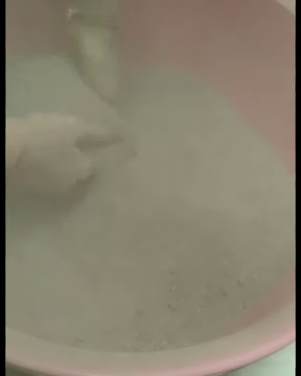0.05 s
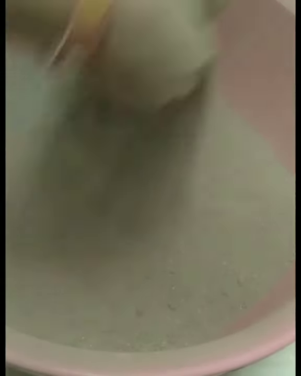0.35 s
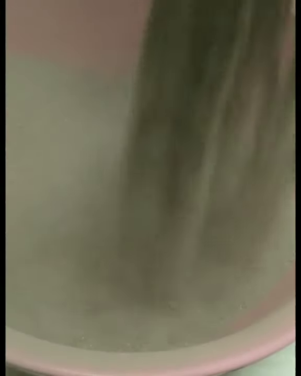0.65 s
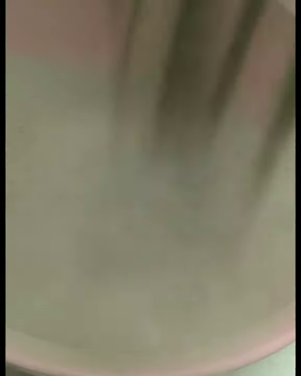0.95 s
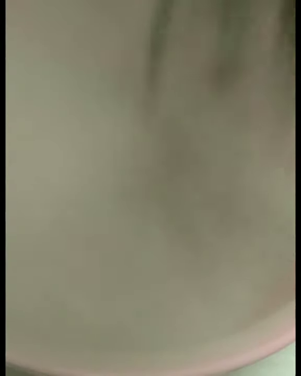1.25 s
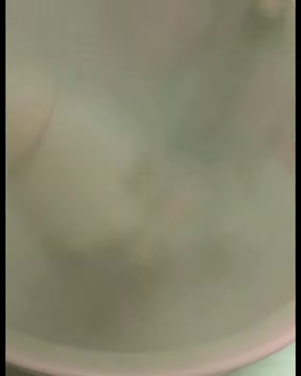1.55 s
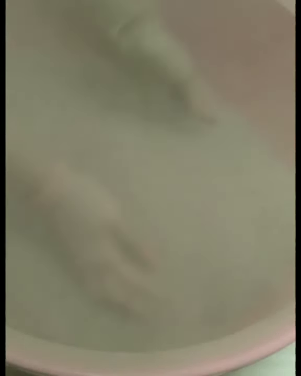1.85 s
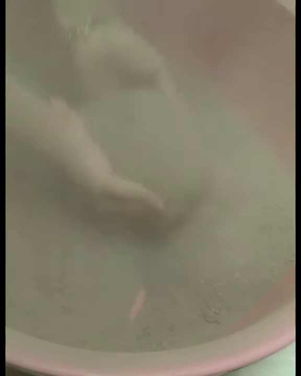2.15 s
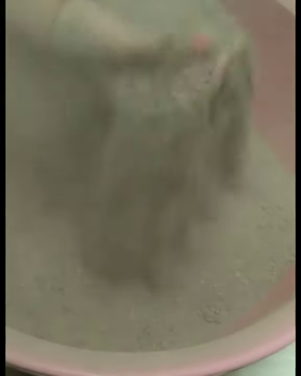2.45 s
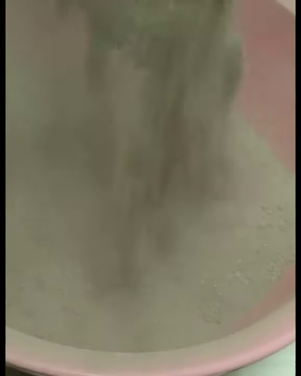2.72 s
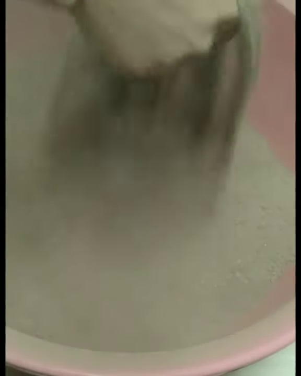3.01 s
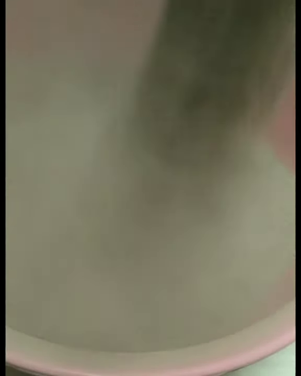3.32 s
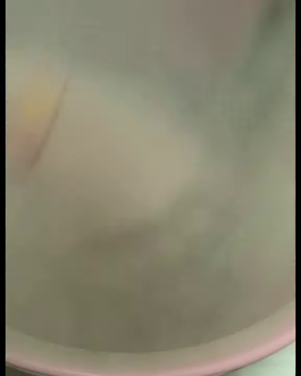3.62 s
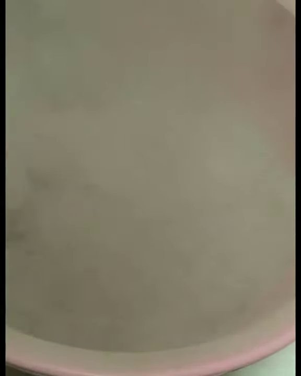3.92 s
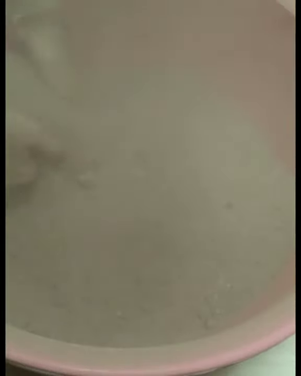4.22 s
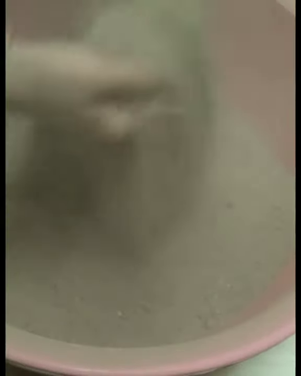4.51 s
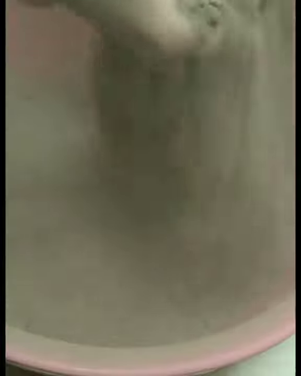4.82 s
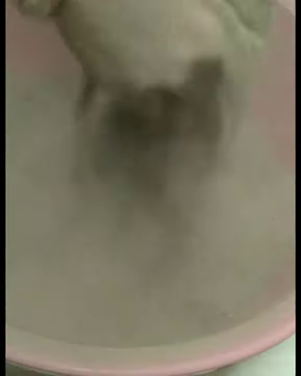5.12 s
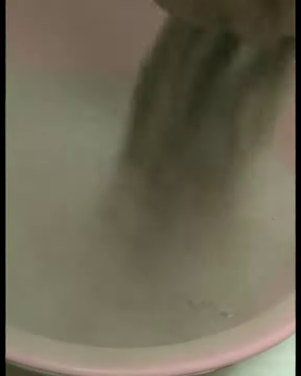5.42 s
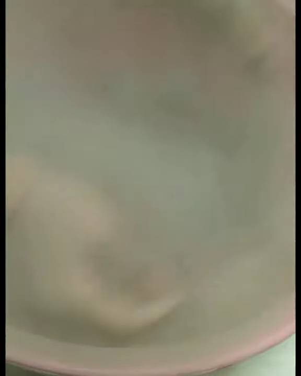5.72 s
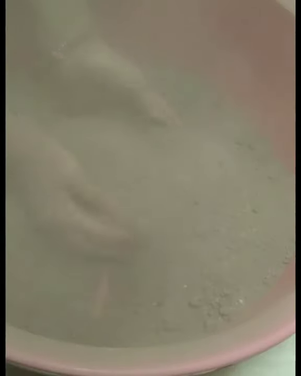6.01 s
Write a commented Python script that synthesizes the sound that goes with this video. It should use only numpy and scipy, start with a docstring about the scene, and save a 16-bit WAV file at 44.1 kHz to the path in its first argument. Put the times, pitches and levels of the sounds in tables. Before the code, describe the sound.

Hands dig through fine dry sand in a plastic tub, swishing, crunching soft lumps and letting handfuls fall in hissing streams.

```python
"""Dry sand in a plastic tub.

Close by, hands dig into fine sand, lift it and let it stream back. Grains shear past the fingers
in a swish and drag along the tub's wall; clods thud on the heap, coarse grains tick, and streams
hiss with countless tiny impacts. Soft lumps crush under the fingers and make the tub ring a little.
A small room rumbles underneath, with a mains hum."""
import sys
import numpy as np
from scipy import signal
from scipy.fft import rfft, irfft, next_fast_len
from scipy.io import wavfile
from scipy.ndimage import uniform_filter1d, map_coordinates

SR = 44100
rng = np.random.default_rng(int(sys.argv[2]) if len(sys.argv) > 2 else 0)


def master_out(mix):
    """Clip the mix to full scale and print it as 16-bit PCM to the path in sys.argv[1]."""
    frames = np.transpose(np.atleast_2d(mix))
    ceiling = np.clip(frames, -1, 1)
    pcm = np.round(ceiling * 32767).astype(np.int16)
    wavfile.write(sys.argv[1], SR, pcm)


N = 267246

# Hand strokes: (peak [s], swish [dB], rise [s], fall [s], scrape re swish [dB], push re swish [dB],
# scrape brightness [-1 dull to 1 bright])
HAND_STROKES = [ (0.028, -46.5, 0.35, 0.15, -11.5, -10, -.4), (0.2, -57.5, 0.094, 1, -2.5, -8, 0),
                (1.275, -54.5, 0.072, 0.22, 5, -22, .3), (1.392, -40, 0.13, 0.12, -15, -18, -0.55),
                (1.575, -50.5, 0.14, 0.13, -6, -4, -0.1), (1.622, -33.5, 0.028, 0.071, -6, -24, -0.4),
                (1.788, -42.5, 0.055, 0.1, -4, -2.5, 0), (1.841, -30, 0.079, 0.097, -12.5, -16, .2),
                (1.871, -36, 0.056, 0.085, 7, -7.5, -0.17), (1.99, -62.5, 0.17, 0.18, 10.5, 7.5, -0.26),
                (3.538, -35, 0.045, 0.06, -4, -38, 0), (3.684, -28.5, 0.05, 0.04, -3.5, -21, .3),
                (3.765, -28, 0.029, 0.083, -4.5, -10, -0.3), (3.868, -23.5, 0.036, 0.071, -18, -17, 0),
                (3.895, -26, 0.24, 0.21, -7, -9.5, 0.4), (3.98, -31, 0.13, 0.15, -10, -9, -.2),
                (4.13, -47.5, 0.15, 0.21, 3, 4.5, -0.099), (4.22, -45.5, 0.087, 0.42, -0.5, -25, 0.23),
                (4.34, -58, 0.089, 0.11, -10, -20, -0.07), (4.755, -39.5, 0.081, 0.087, 1, -12, -.6),
                (4.847, -39.5, 0.17, 0.22, -6, -37, -0.16), (5.459, -38.5, 0.043, 0.071, -9, -19, -0.1),
                (5.605, -27.5, 0.019, 0.035, -28, -34, 0), (5.651, -30.5, 0.092, 0.17, -9, -17, -0.25),
                (5.818, -33.5, 0.043, 0.045, -3, -6.5, -0.3), (5.919, -29, 0.12, 0.19, -1, -12.5, 0.27), ]
# Sand sliding on the tub's wall: (peak [s], level [dB], rise [s], fall [s], ring pitch [Hz])
WALL_DRAGS = [(0.03, -53.5, 0.053, 0.047, 780), (1.398, -48.5, 0.049, 0.035, 1080),
              (1.638, -49, .04, .045, 1110), (2.77, -57.5, 0.31, 0.15, 990),
              (3.89, -44.5, 0.18, 0.29, 1036), (4.13, -54.5, 0.059, 0.082, 1050),
              (4.29, -54, 0.16, 0.18, 1065), (4.78, -46, .05, 0.066, 1060), (5.685, -44.5, .04, 0.044, 970)]
# Clods landing: (time [s], thud [dB], pat [dB], push pitch [Hz])
CLOD_LANDINGS = [(0.025, -38.5, -45, 400), (0.497, -32.5, -42, 365), (0.508, -30.5, -33, 340),
                 (0.616, -35, -50, 400), (1.592, -34, -52, 233), (1.625, -36.5, -44, 470),
                 (1.848, -35.5, -44, 270), (2.4126, -38, -40, 404), (2.461, -40, -32.5, 416),
                 (2.4723, -34, -32.5, 400), (2.98, -38.5, -52, 390), (3.133, -40.5, -52, 253),
                 (3.715, -29, -33, 397), (3.986, -30, -50, 240), (4.103, -34, -50, 280),
                 (4.723, -31, -35, 584), (5.202, -33, -51, 447), (5.212, -38, -41, 393),
                 (5.463, -33, -43, 330), (5.48, -36, -54, 377), (5.808, -35, -46, 250),
                 (5.958, -32, -46, 257)]
# Single coarse grains: (time [s], snap [dB], ping re snap [dB])
GRAIN_TICKS = [(0.3335, -26, -14), (0.3604, -28, -10), (0.566, -30, -7), (0.638, -22.5, -10),
               (0.7967, -38, -12), (0.813, -23, -14), (0.986, -25, -14), (1.1518, -26, -14),
               (1.164, -32, -10), (1.255, -34, 4), (1.623, -10, -12), (2.554, -21, -20), (2.9542, -22, -17),
               (3.005, -32, -12), (3.2333, -20, -9), (3.2357, -26, -10), (3.253, -38, -10),
               (3.4885, -33, -12), (5.0158, -23.5, 0), (5.2767, -25, -16), (5.4252, -25, -17)]
# Handfuls let go: (trickle start [s], trickle end [s], trickle [dB], rush peak [s], rush [dB],
# rise [s], fall [s], rustle [dB])
HANDFULS = [(0.46, 1.13, -50, 0.97, -40, 0.33, 0.16, -45),
            (2.493, 3.43, -48.5, 2.754, -45, 0.26, 0.25, -47),
            (4.746, 5.358, -49, 4.93, -37.5, 0.032, 0.22, -44.5)]
# Lumps giving way: (time [s], crunch [dB], knock [dB], collapse [s], ring [dB])
LUMP_CRUSHES = [(1.381, -22, -47, .002, -36), (1.393, -36, -46, .004, -33),
                (1.6119, -14, -41, 0.002, -29.5), (3.5285, -11.7, -32.5, 0.0041, -40),
                (3.6662, -16.5, -34, .002, -38), (3.6818, -14.5, -42, 0.0039, -39),
                (3.757, -23, -36, .002, -38), (3.867, -31, -44, 0.0034, -36), (4.128, -34, -45, .002, -34),
                (4.2109, -21, -35, 0.0027, -35), (4.6718, -29, -49, 0.0036, -46),
                (4.7199, -15, -28, 0.0028, -40), (4.7478, -13.5, -44, 0.0025, -32),
                (4.7617, -23, -36, .003, -28), (4.7727, -23, -39.5, 0.0024, -29),
                (4.8317, -19.5, -38, .002, -48), (4.8391, -39, -33.5, 0.0024, -30),
                (4.8494, -18, -40, 0.0013, -40), (5.359, -36, -52, .002, -47),
                (5.455, -18, -46, 0.0041, -41.5), (5.6035, -14.5, -46, 0.0022, -32),
                (5.646, -17.5, -30, 0.0075, -25), (5.684, -15.5, -39, .0015, -40),
                (5.7897, -24.5, -41, .003, -50), (5.817, -28, -38, 0.0028, -28)]

# Source spectra: (frequency [Hz], level [dB])
RUMBLE_SPECTRUM = [(15, -5), (26, -3.5), (36, -6.5), (60, -7), (100, -11), (130, -16.5), (200, -21),
                   (330, -26), (550, -28.5), (1200, -34), (3000, -34.5), (16000, -37)]
SWISH_SPECTRUM = [(1000, -36), (2500, -14.5), (4000, -7), (5700, -6), (7000, -2.5), (8400, -0.5),
                  (9700, -1.5), (11000, -8.5), (13000, -9), (15400, -14), (16000, -13)]
SCRAPE_SPECTRUM = [(300, -16.5), (750, -16), (1050, -10), (1350, -3), (1900, 0.5), (2700, 2), (4000, -1.5),
                   (6000, -6), (8500, 1), (11000, -13), (16000, -41)]
SHOVE_SPECTRUM = [(100, -14), (190, -11), (260, -6.5), (360, -4.5), (480, -2.5), (620, -1), (780, -1),
                  (900, -5.5), (1300, -9.5), (3000, -38)]
THUD_SPECTRUM = [(80, -34), (180, -19), (250, 0), (380, -1), (600, -6.5), (1000, -7), (2300, -17),
                 (16000, -34)]
PAT_SPECTRUM = [(300, -37), (700, 0.5), (1000, -2), (1500, 3), (2400, -4), (3300, -8), (5000, -12),
                (16000, -10)]
SNAP_SPECTRUM = [(500, -12), (4000, -7.5), (7000, 1.5), (9500, 8.5), (12000, 0), (16000, 4.5)]
HISS_SPECTRUM = [(300, -19), (700, -13), (1060, -11.5), (1400, -15.5), (2100, -13.5), (2800, -9),
                 (4100, -8.5), (5400, -5.5), (6500, -3), (8600, 2), (10000, -2), (11500, -7), (15200, -8.5),
                 (16000, -20)]
RUSTLE_SPECTRUM = [(250, -21), (500, -11), (750, -3.5), (1050, -10), (1400, -4.5), (2000, -1.5), (2800, 7),
                   (4000, 0), (6000, 3.5), (8500, 6.5), (11000, -22), (16000, -37)]
PATTER_SPECTRUM = [(90, -39), (170, -1.5), (290, 5.5), (370, 5.5), (500, -1), (680, 0.5), (900, -14),
                   (1300, -5.5), (2500, -14.5)]
CRUNCH_SPECTRUM = [(300, -11.5), (700, -21), (1200, 0.5), (2000, -6), (3000, -5.5), (4500, 0), (6500, 2.5),
                   (9000, 7.5), (11500, -0.5), (13000, -11), (16000, 0)]

# Tub resonances: (frequency [Hz], width [Hz], level [dB])
TUB_MODES = [(375, 20, -2.5), (627, 93, -5), (790, 41, -2.5), (1007, 99, 1.5), (1590, 330, -2),
             (2720, 350, -5), (3292, 18, -0.5), (4390, 25, -3)]
# Room decay: (frequency [Hz], T60 [s])
ROOM_DECAY = [(200, 0.25), (2000, 0.24), (12000, 0.22)]
# Left-right likeness: (frequency [Hz], correlation [0 to 1])
COHERENCE = [(60, 0.96), (200, 1), (400, 0.98), (700, 0.92), (1300, 0), (2400, 0.095), (16000, 0)]
# Stereo balance: (frequency [Hz], left minus right [dB])
HAND_PAN = [(150, 0), (700, 1.5), (1100, 2.5), (2400, .5), (5000, 1.5), (7500, 2), (9000, 5), (10300, 7.5),
            (12000, 6), (16000, 5.5)]
STREAM_PAN = [(150, 0.5), (1000, 2.5), (2400, 0), (7000, 0.5), (9500, 6), (12000, 0.5), (16000, -2.5)]

FLOW_REF_DB = -49


def amp(db):
    """Decibels to gain."""
    return 10 ** (np.asarray(db) / 20)


def unit(x):
    """Scale to rms 1."""
    return x / np.sqrt(np.mean(x ** 2) + 1e-20)


def along(points, hz):
    """Interpolate (Hz, value) points on a log axis."""
    knots_hz, values = np.transpose(points)
    return np.interp(np.log(hz + 1), np.log(knots_hz + 1), values)


def wobble(rate_hz):
    """Smooth random curve through rate_hz knots a second."""
    knots = rng.standard_normal(int(N * rate_hz / SR) + 4)
    return map_coordinates(knots, [np.arange(N) * rate_hz / SR])


def filtered(x, response):
    """Apply a frequency response."""
    size = next_fast_len(N + SR // 2)
    return irfft(rfft(x, size) * response(np.fft.rfftfreq(size, 1 / SR)), size)[..., :N]


def colour(spectrum):
    """Response of a (Hz, dB) spectrum."""
    return lambda hz: amp(along(spectrum, hz))


def resonance(hz, centre_hz, width_hz):
    """Response of one damped mode."""
    return 1j * hz * width_hz / (centre_hz ** 2 - hz ** 2 + 1j * hz * width_hz)


def tub(hz):
    """Response of the sand-damped plastic tub."""
    return sum((-1) ** k * amp(db) * resonance(hz, centre_hz, width_hz)
               for k, (centre_hz, width_hz, db) in enumerate(TUB_MODES))


def placed(pair, response, pan):
    """Colour two signals by a power-normalised response into left and right, alike in the bass."""
    angle = lambda hz: np.arccos(np.clip(along(COHERENCE, hz), -1, 1)) / 2
    grid_hz = np.linspace(0, SR / 2, 8192)
    mid_power = np.abs(response(grid_hz) * np.cos(angle(grid_hz))) ** 2
    pan_power = np.cosh(np.log(amp(along(pan, grid_hz))))
    norm = np.sqrt(np.mean(mid_power * pan_power))
    mid, side = filtered(pair, lambda hz: response(hz) / norm * [np.cos(angle(hz)), np.sin(angle(hz))])
    left_right = np.array([mid + side, mid - side])
    return filtered(left_right, lambda hz: amp(np.outer([.5, -.5], along(pan, hz))))


def grains(rate_hz, spread_db):
    """Random collisions of uneven size; each reaches the two channels differently."""
    hit = rng.random(N) < rate_hz / SR
    size = amp(spread_db * np.clip(rng.standard_normal(N), -2, 2))
    return unit(hit * size * rng.standard_normal((2, N)))


def patchy(x, depth_db):
    """Mottled hiss: gains drift at random in patches of time and frequency."""
    bins = signal.stft(x, nperseg=512)[2]
    patches = uniform_filter1d(rng.standard_normal(bins.shape[1:]), size=6, axis=0)
    patches = uniform_filter1d(patches, size=10, axis=1)
    return unit(signal.istft(bins * amp(depth_db * unit(patches)), nperseg=512)[1][:, :N])


def swell(peak_s, rise_s, fall_s, depth_db=22.5):
    """Gain of a move that speeds up and slows; depth_db down at rise_s before and fall_s after the peak."""
    t = np.arange(N) / SR - peak_s
    away = (np.maximum(-t, 0) / rise_s) ** 1.63 + (np.maximum(t, 0) / fall_s) ** 1.346
    return amp(-depth_db * np.minimum(away, 10))


def bursts(events, t60_s, attack_s):
    """Envelope of events that rise, hold and die: (time [s], level [dB], hold [s])."""
    t, out = np.arange(SR // 3) / SR, np.zeros(N + SR)
    attack = 1 - np.exp(-t / attack_s)
    for at_s, db, hold_s in events:
        out[round(at_s * SR):][:len(t)] += attack * amp(db - 60 * np.maximum(t - hold_s, 0) / t60_s)
    return out[:N]


def background(hum_hz=100, dip_db=18.5, dip_at_s=2.27, dip_half_width_s=0.67):
    """Low room rumble and a mains hum that wavers and dips once."""
    t = np.arange(N) / SR
    rumble = placed(rng.standard_normal((2, N)), colour(RUMBLE_SPECTRUM), pan=[(100, 0)])
    hum = np.sqrt(2) * np.sin(2 * np.pi * hum_hz * t + 0.63 * wobble(2.84))
    dip = np.exp(-((t - dip_at_s) / dip_half_width_s) ** 4)
    return amp(-54.5) * rumble + amp(-58 - dip_db * dip) * hum


def hand_effort():
    """One swell per stroke drives the gains of swish, scrape (dull, middle, bright) and push."""
    power = np.array([amp(db) * swell(peak_s, rise_s, fall_s)
                      for peak_s, db, rise_s, fall_s, *_ in HAND_STROKES]) ** 2
    *_, scrape_db, push_db, brightness = np.transpose(HAND_STROKES)
    scrape_power = amp(scrape_db) ** 2 @ power
    push_power = amp(push_db) ** 2 @ power
    mean_brightness = np.clip(brightness, -1, 1) * amp(scrape_db) ** 2 @ power / scrape_power
    blend = np.maximum(1 - np.abs(mean_brightness - np.array([[-1], [0], [1]])), 0)
    return np.sqrt(power.sum(axis=0)), blend * np.sqrt(scrape_power), np.sqrt(push_power)


def hands(swish, scrape, push, brightness_ratio=1.6):
    """Grains slip past the fingers; a firm hand scrapes, stirs the tub and shoves the heap."""
    slips = amp(0.81 * wobble(90))
    fine = slips * swish * patchy(grains(rate_hz=26000, spread_db=0), depth_db=3.5)
    jams = unit(amp(2.5 * wobble(220)))  # coarse grains jam and let go
    rasp = jams * patchy(grains(rate_hz=4500, spread_db=1.5), depth_db=4)
    coarse = np.zeros((2, N))
    for step, gain in enumerate(scrape, -1):
        spectrum = [(hz * brightness_ratio ** step, db) for hz, db in SCRAPE_SPECTRUM]
        coarse += placed(rasp * gain, colour(spectrum), HAND_PAN)
    lurches = unit(amp(1.4 * wobble(60)))  # clumps catch and yield
    shove = lurches * push * patchy(grains(rate_hz=2500, spread_db=2.5), depth_db=2.5)
    stir = scrape.sum(axis=0) * grains(rate_hz=8300, spread_db=0.5)
    return (amp(1.48) * placed(fine, colour(SWISH_SPECTRUM), HAND_PAN)
            + amp(-2.1) * coarse
            + amp(-10.5) * placed(stir, tub, HAND_PAN)
            + amp(-2) * placed(shove, colour(SHOVE_SPECTRUM), HAND_PAN))


def wall_drags(width_hz=110):
    """Grains dragged along the wall keep the tub's main mode ringing, each drag at its own pitch."""
    out = np.zeros((2, N))
    for peak_s, db, rise_s, fall_s, ring_hz in WALL_DRAGS:
        gain = amp(db + 2.6 * wobble(60)) * swell(peak_s, rise_s, fall_s)
        friction = gain * grains(rate_hz=1500, spread_db=2)
        out += placed(friction, lambda hz: resonance(hz, ring_hz, width_hz), HAND_PAN)
    return out


def grit(motion):
    """A few larger grains prickle wherever sand moves, standing out most in a thin trickle."""
    prickle = (motion / amp(FLOW_REF_DB)) ** 0.7 * grains(rate_hz=170, spread_db=2)
    return amp(-58) * placed(prickle, colour(SNAP_SPECTRUM), STREAM_PAN)


def clods(push_db=-8, push_t60_s=0.043):
    """Clods land: a pat of contact, a damped push from their weight, a dull thud as they spread."""
    thuds = bursts([(at_s, db, 0) for at_s, db, _, _ in CLOD_LANDINGS], t60_s=0.049, attack_s=0.0015)
    pats = bursts([(at_s, db, 0) for at_s, _, db, _ in CLOD_LANDINGS], t60_s=0.019, attack_s=0.0003)
    thud = placed(thuds * rng.standard_normal((2, N)), colour(THUD_SPECTRUM), STREAM_PAN)
    pat = placed(pats * rng.standard_normal((2, N)), colour(PAT_SPECTRUM), STREAM_PAN)
    t, push = np.arange(SR // 8) / SR, np.zeros(N + SR)
    for at_s, thud_db, _, hz in CLOD_LANDINGS:
        decay = amp(thud_db + push_db - 60 * t / push_t60_s)
        push[round(at_s * SR):][:len(t)] += decay * np.sin(2 * np.pi * hz * t)
    return pat + push[:N] + amp(-9.5) * thud


def ticks(ping_hz=8740, scatter=0.028, ping_t60_s=0.023):
    """Coarse grains snap against each other, each with its own tiny ping."""
    t, pings = np.arange(SR // 8) / SR, np.zeros((2, N + SR))
    for at_s, snap_db, ping_db in GRAIN_TICKS:
        detune, *phases = rng.standard_normal(3)
        cycles = np.add.outer(phases, ping_hz * (1 + scatter * detune) * t)
        decay = amp(snap_db + ping_db - 60 * t / ping_t60_s)
        pings[:, round(at_s * SR):][:, :len(t)] += decay * np.sin(2 * np.pi * cycles)
    snaps = bursts([(at_s, db, 0) for at_s, db, _ in GRAIN_TICKS], t60_s=0.015, attack_s=0.00039)
    snap = placed(snaps * rng.standard_normal((2, N)), colour(SNAP_SPECTRUM), STREAM_PAN)
    return amp(-6.5) * snap + pings[:, :N]


def sand_flow(build_db_per_s=54.5, run_out_db_per_s=28):
    """Gains of flow and sheet: a handful trickles, and rushes in a thick sheet as the hands open."""
    t, flow, sheet = np.arange(N) / SR, np.zeros(N), np.zeros(N)
    for start_s, end_s, trickle_db, peak_s, rush_db, rise_s, fall_s, rustle_db in HANDFULS:
        build_db = build_db_per_s * np.maximum(start_s - t, 0)
        run_out_db = run_out_db_per_s * np.maximum(t - end_s, 0)
        trickle = amp(trickle_db - build_db - run_out_db)
        rush = swell(peak_s, rise_s, fall_s)
        flow = np.hypot(flow, np.hypot(trickle, amp(rush_db) * rush))
        sheet += amp(rustle_db) * rush
    return flow, sheet


def streams(flow, sheet):
    """Falling sand: tiny impacts hiss, a thick sheet rustles, strands patter on the heap."""
    hiss = flow * amp(1.4 * wobble(45)) * patchy(grains(rate_hz=26000, spread_db=0), depth_db=3.5)
    rustle = sheet * grains(rate_hz=6000, spread_db=3.5)
    strands = amp(-60 + 3.5 * wobble(32)) * (flow / amp(FLOW_REF_DB)) ** 0.77
    patter = strands * grains(rate_hz=3500, spread_db=2)
    return (placed(hiss, colour(HISS_SPECTRUM), STREAM_PAN)
            + placed(rustle, colour(RUSTLE_SPECTRUM), STREAM_PAN)
            + placed(patter, colour(PATTER_SPECTRUM), STREAM_PAN))


def lumps():
    """A lump collapses in a spray of fractures; so small a blow rings mainly the tub's upper modes."""
    sprays = bursts([(at_s, db, hold_s) for at_s, db, _, hold_s, _ in LUMP_CRUSHES],
                    t60_s=0.028, attack_s=0.0005)
    blows = bursts([(at_s, db, hold_s) for at_s, _, db, hold_s, _ in LUMP_CRUSHES],
                   t60_s=0.045, attack_s=0.0005)
    crunch = placed(sprays * grains(rate_hz=13000, spread_db=1.5), colour(CRUNCH_SPECTRUM), HAND_PAN)
    upper_modes = lambda hz: tub(hz) * (1j * hz / (650 + 1j * hz)) ** 2 / (1 + 1j * hz / 4500)
    knock = placed(blows * grains(rate_hz=12000, spread_db=0), upper_modes, HAND_PAN)
    return amp(-9) * crunch + amp(-2.5) * knock


def tub_rings(ring_hz=1039, scatter=0.082, t60_s=0.037, attack_s=0.0012, left_lead_rad=0.94):
    """Each lump nudges the tub's main mode: a short hollow note, its pitch scattered at random."""
    t, out = np.arange(SR // 8) / SR, np.zeros((2, N + SR))
    for at_s, *_, db in LUMP_CRUSHES:
        hz = ring_hz * (1 + scatter * rng.standard_normal())
        phase = 2 * np.pi * hz * t + left_lead_rad * np.array([[.5], [-.5]])
        envelope = amp(db - 60 * t / t60_s) * (1 - np.exp(-t / attack_s))
        out[:, round(at_s * SR):][:, :len(t)] += envelope * np.sin(phase)
    return out[:, :N]


def room(x):
    """Short diffuse tail; the treble dies first."""
    hz, t, bins = signal.stft(rng.standard_normal((2, SR // 2)), SR, nperseg=256)
    decay = amp(-60 * t / along(ROOM_DECAY, hz)[:, None])
    tail = signal.istft(bins * decay, SR, nperseg=256)[1]
    return signal.fftconvolve(x, tail / np.linalg.norm(tail[0]), axes=1)[:, :N]


def scene():
    """All the sand, coloured by the tub's hollow, plus room reflections and background."""
    flow, sheet = sand_flow()
    swish, scrape, push = hand_effort()
    sand = streams(flow, sheet) + hands(swish, scrape, push) + wall_drags()
    sand = sand + lumps() + tub_rings() + clods() + ticks()
    sand += grit(flow + 0.2 * scrape.sum(axis=0))
    sand = filtered(sand, lambda hz: 1 + .5 * np.abs(tub(hz)))
    return amp(-1.3) * (sand + amp(-5) * room(sand)) + background()


def record(dry):
    """Brick-wall low-pass."""
    return filtered(dry, lambda hz: hz < 15850)


dry = scene()
out = record(dry)
master_out(out)
```